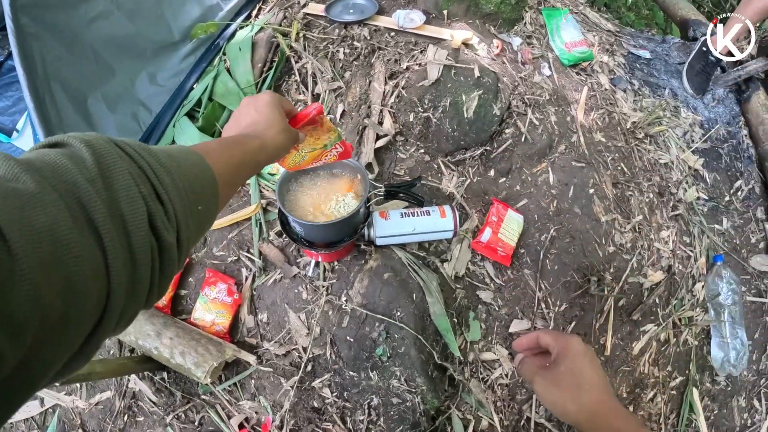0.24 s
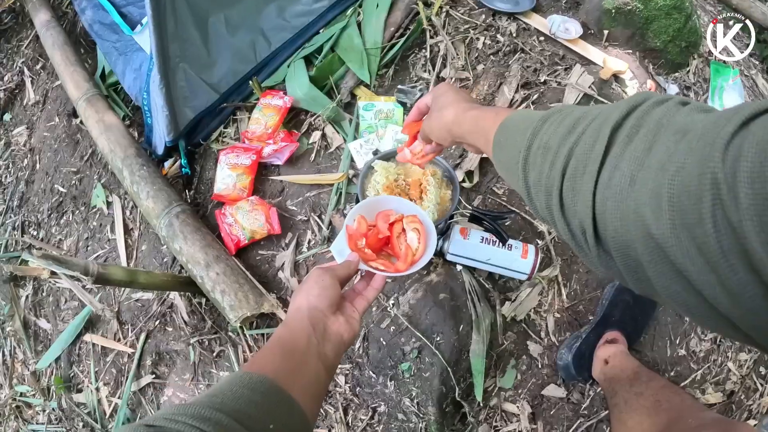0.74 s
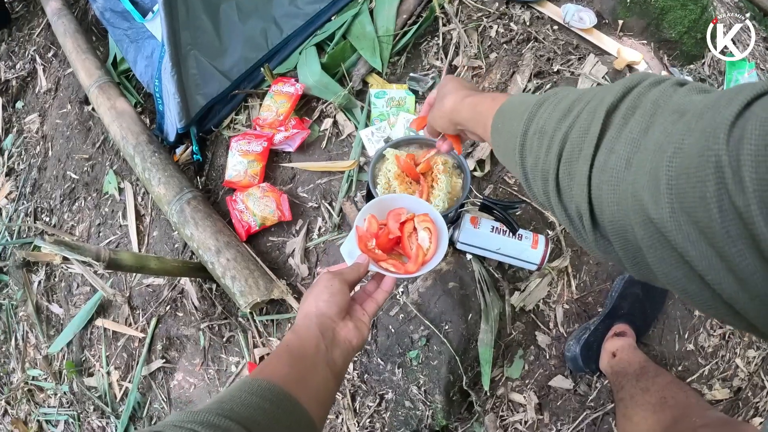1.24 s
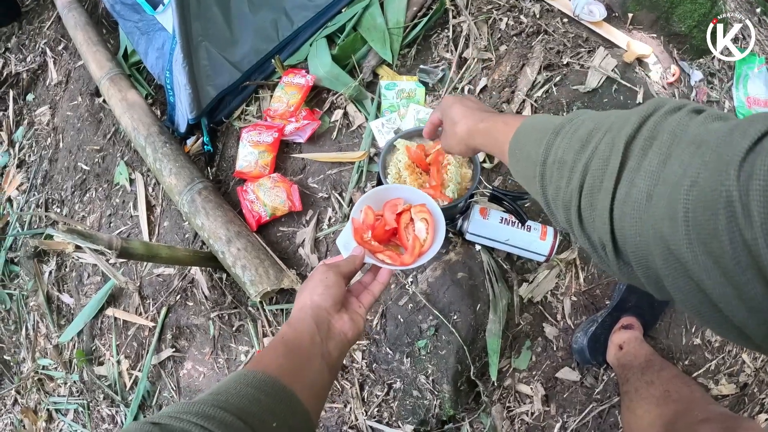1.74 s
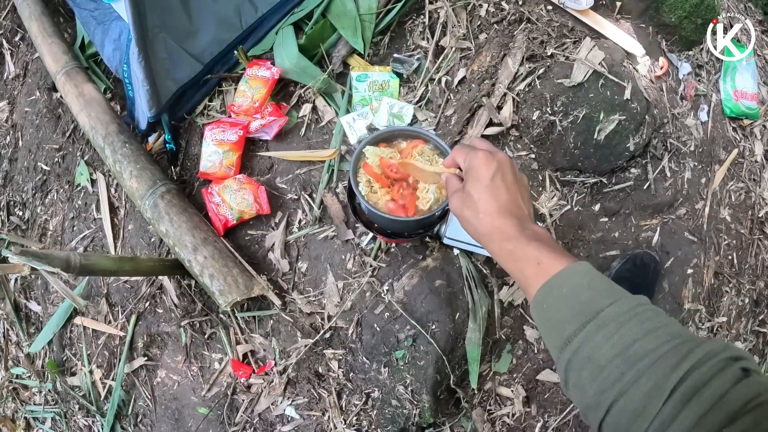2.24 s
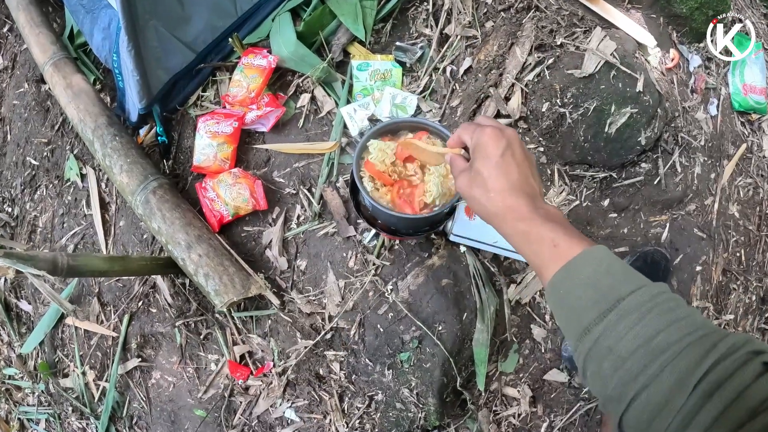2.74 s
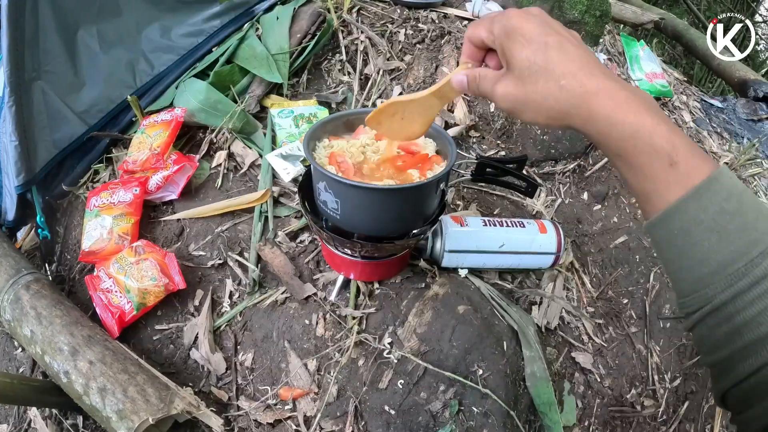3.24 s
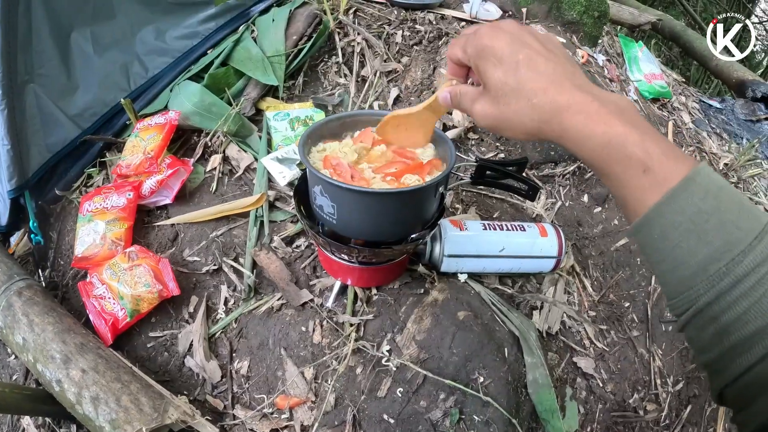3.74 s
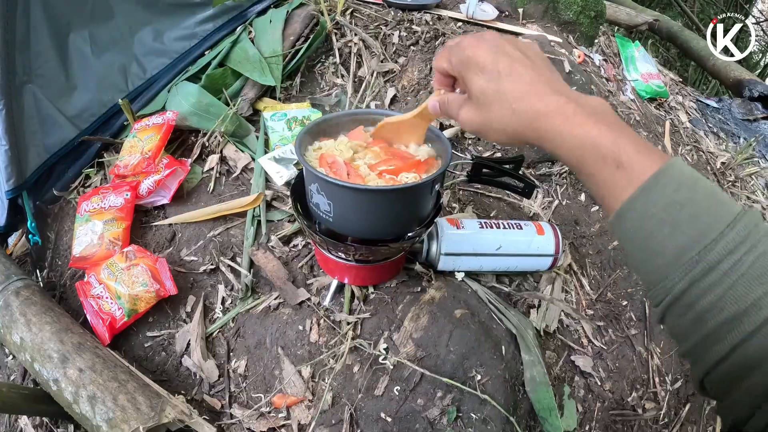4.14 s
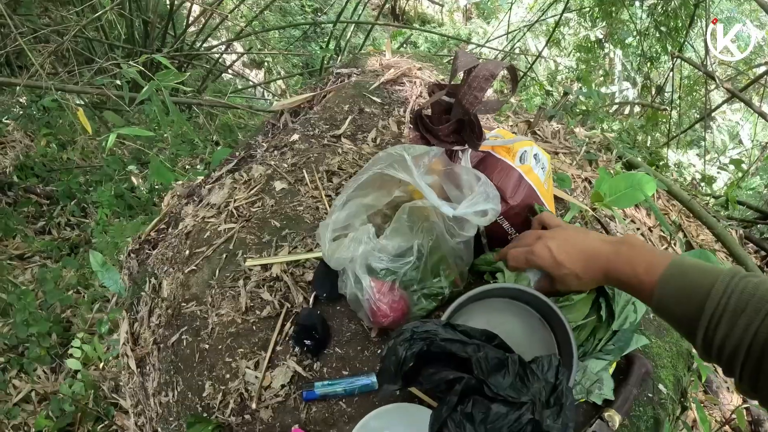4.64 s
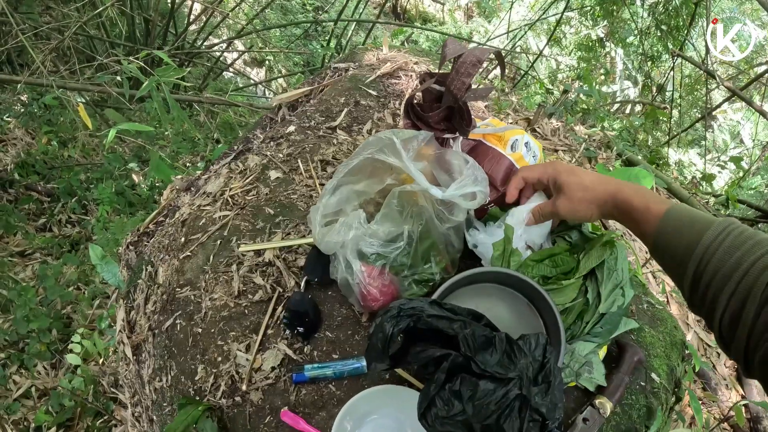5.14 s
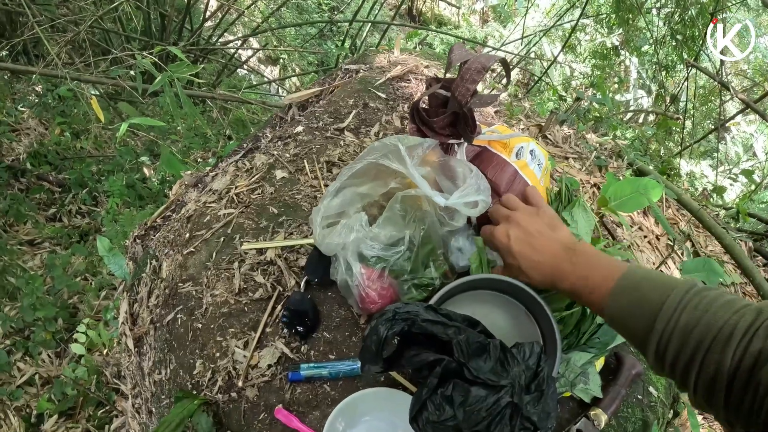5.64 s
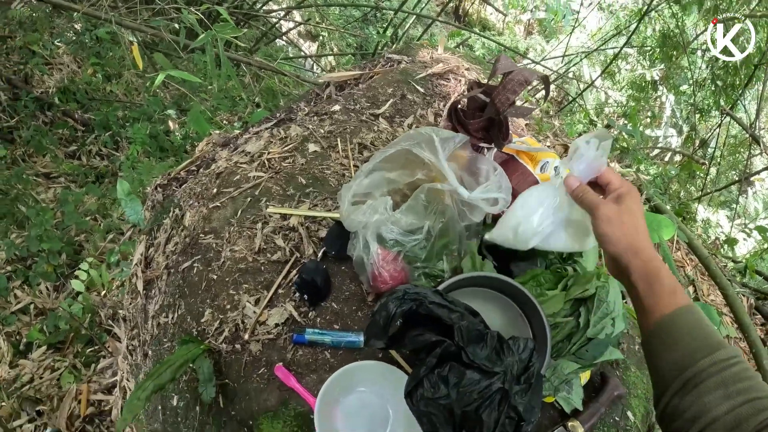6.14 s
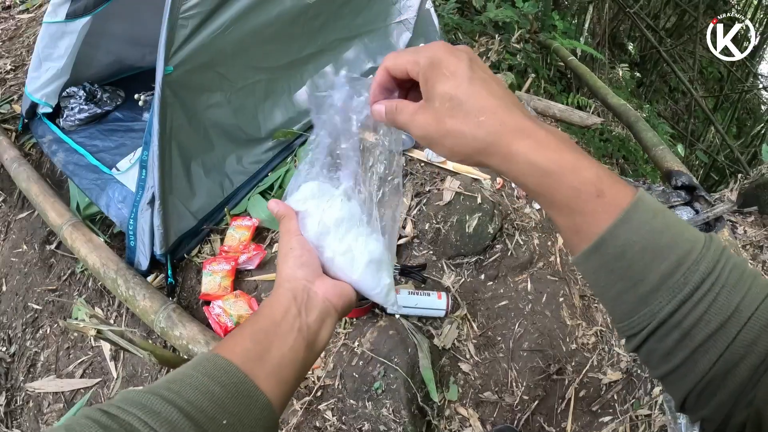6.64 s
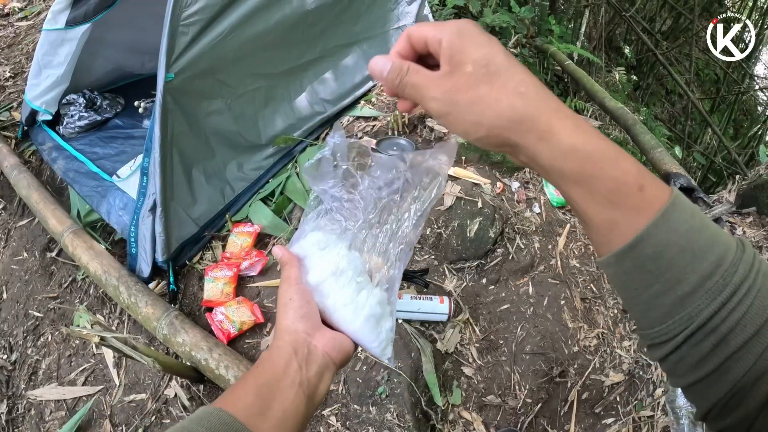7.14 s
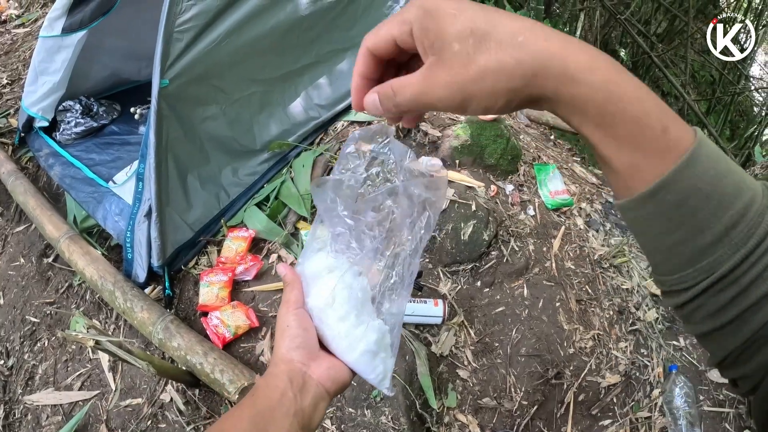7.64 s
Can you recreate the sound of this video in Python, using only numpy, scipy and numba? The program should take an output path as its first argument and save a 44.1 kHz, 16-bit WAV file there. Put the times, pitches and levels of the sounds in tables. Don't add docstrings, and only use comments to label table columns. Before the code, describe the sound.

Outdoors at a forest camp, close stereo, dry, with gas-burner hiss, buzzing cicadas and a thin, very high cricket. From 0 to 0.55 s a stiff packet crackles brightly. After a tiny gap, 0.6-1.7 s is quieter: soft simmering, faint stirring and small mount creaks. From 1.8 to 2.9 s, air rumble, a heavy low bump at the start and another cluster near 2.5 accompany dull bowl and pot taps. At 2.95-4.4 s a wooden spoon stirs, with clear taps around 3.8 and 4.2. From 4.5 to 6.3 s cicadas rise and a hand rustles through thin bags, snapping more toward the end. At 6.35-7.65 s a large bag crackles in jerks, loudest near 6.75 and 7.5, with a lull between. From 7.7 s it is pulled wide with sharp snaps, ending abruptly near 7.95. Every change is a hard stop, brief silence, quick fade-in.

```python
import sys
import numpy as np
from scipy import signal
from scipy.fft import rfft, irfft, next_fast_len
from scipy.io import wavfile
from scipy.ndimage import uniform_filter1d
from numba import njit

SR = 44100
rng = np.random.default_rng(int(sys.argv[2]) if len(sys.argv) > 2 else 0)


def dump_mix(stems):
    frames = np.atleast_2d(stems).T
    limited = np.clip(frames, -1, 1)
    pcm = np.round(limited * 32767).astype(np.int16)
    wavfile.write(sys.argv[1], SR, pcm)


def attenuation_scalar(level_db):
    decades = np.asarray(level_db, float) / 20
    return 10 ** decades


N = 348390

# (start [s], end [s], cicada level [dB])
TAKES = [
    (-.05, 0.5514, -54.5),
    (0.6015, 1.7333, -55.5),
    (1.783, 2.8898, -55),
    (2.9425, 4.418, -54),
    (4.4665, 6.3014, -42),
    (6.3503, 7.6747, -48.5),
    (7.7245, 7.95, -47),
]
# (film rustle [dB], crisp crackle [dB], simmer [dB], air on the ports [dB])
REST = [(-52.5, -52.5, -55.5, -60.5), (-63, -61, -49, -54.5), (-48.5, -55, -72, -57),
        (-59, -59, -55.5, -56.5), (-57, -48.5, -58, -55.5), (-49.5, -52, -51, -56), (-44.5, -46, -56, -57)]


def unit(x):
    return x / np.sqrt(np.mean(x ** 2))


def colour(x, points):
    hz, db = np.transpose(points)
    size = next_fast_len(N, True)
    axis = np.arange(size // 2 + 1) * SR / size + 1e-3
    gain = attenuation_scalar(np.interp(np.log(axis), np.log(hz), db))
    return unit(irfft(rfft(x, size) * gain, size)[:N])


def walk(rate):
    k = int(SR / rate)
    held = np.repeat(rng.standard_normal(N // k + 1), k)
    return 1.3 * uniform_filter1d(uniform_filter1d(held, k), k)[:N]


def twin(x):
    return np.array([x, np.roll(x, N // 3)])


@njit
def ring(start, hz, cycles, size, rise):
    out = np.zeros(N)
    for k in range(len(start)):
        turn = np.exp((2j * np.pi - np.log(10) / cycles[k]) * hz[k] / SR)
        z, held = size[k] + 0j, 1.
        slower = np.exp(-hz[k] / SR / rise)
        last = min(N, int(start[k] + 2.5 * cycles[k] * SR / hz[k]))
        for i in range(max(0, int(start[k])), last):
            out[i] += z.imag * (1 - held)
            z *= turn
            held *= slower
    return out


def grains(lo_hz, hi_hz, cycles, scatter_db, count):
    when, pitch, length, size = rng.random((count, 4)).T
    hz = lo_hz * (hi_hz / lo_hz) ** pitch
    loudness = attenuation_scalar(-scatter_db * np.log(1.01 - size))
    return unit(ring(when * N, hz, cycles * (.5 + length), loudness, .4))


def struck(table, spread_s, count, rise, octaves=1.46, fade_db=12):
    s, db, hz, cycles = np.repeat(np.transpose(table), count, axis=1)
    follows = np.arange(len(s)) % count > 0
    late, pitch = rng.random((len(s), 2)).T * follows
    start = (s + spread_s * late - rise / hz) * SR
    pitches = hz * 2 ** (octaves * (pitch - .5) * (late > 0))
    return ring(start, pitches, np.clip(cycles, 1, 40), attenuation_scalar(db - fade_db * np.sqrt(late)), max(rise, .01))


def ports(x, other, share, lead, pan_db, band_hz=(5, 5000)):
    share = np.clip(share, 0, .9)
    shift = np.real(signal.hilbert(x, next_fast_len(N))[:N] * (np.exp(1j * lead) - 1))
    right = x + signal.filtfilt(*signal.butter(1, band_hz, "band", fs=SR), shift)
    both = np.sqrt(1 - share ** 2) * np.array([x, right]) + share * np.array([other, -other])
    return both * attenuation_scalar(np.array([pan_db, -pan_db]) / 2)


def effort(t, moves, rise_db_s, fall_db_s):
    coarse = t[::44]
    power = np.zeros(len(coarse))
    for s, hold, db in np.transpose(moves):
        before = np.maximum(s - coarse, 0)
        after = np.maximum(coarse - s - hold, 0)
        power += attenuation_scalar(2 * (db - rise_db_s * before - fall_db_s * after))
    return np.interp(t, coarse, power)


def port_noise():
    tone = [(6000, -36), (11000, 3), (12300, 10), (12900, -15), (14800, -3), (15800, -40)]
    left_db, right_db = -72, -81
    return [attenuation_scalar(db) * colour(rng.standard_normal(N), tone) for db in (left_db, right_db)]


def burner(take):
    # (frequency [Hz], level per Hz [dB])
    places = [
        [(59, -40), (100, -9), (228, -4.5), (861, -5.5), (977, 0), (2930, -6), (3770, -1.5), (6260, -10.5),
         (7730, -7.5), (15500, -49)],
        [(59, -33), (100, -8), (258, -22), (1020, 2), (2580, -7), (3770, -3.5), (6530, -12.5), (7730, -9),
         (12300, -32.5), (15500, -53.5)],
        [(59, -28), (100, -1.5), (228, -1), (420, -8.5), (843, -8.5), (2000, -7), (5630, -11.5), (6530, -16.5),
         (7890, -8), (15500, -48.5)],
        [(59, -5), (100, 0.5), (313, -1), (758, -21), (977, -8.5), (3850, -9), (6260, -21), (8230, -22.5),
         (14200, -40), (15500, -58)],
        [(59, -44), (100, -23), (564, -1), (843, -12.5), (977, -6), (1160, -4.5), (1960, -3.5), (3930, -5.5),
         (8770, -11.5), (15500, -70)],
        [(59, -41), (100, -10), (214, 0.5), (712, -4.5), (977, 5), (1430, -3.5), (1920, -3.5), (3850, -7.5),
         (8770, -19), (15500, -59)],
    ]
    hiss_db = [-44, -45, -43.5, -45.5, -42, -48, -43]
    jet = rng.standard_normal(N) * attenuation_scalar(0.87 * walk(25) + 1.0 * walk(150))
    hiss = np.choose(np.minimum(take, 5), [twin(colour(jet, points)) for points in places])
    return hiss * attenuation_scalar(hiss_db)[take]


def cicadas(take):
    # (multiple of the note, level [dB])
    overtones = [(1, -1.5), (2, 2.5), (3, 2), (4, 2), (5, -3.5), (6, -12)]
    note_hz, spread = 977.6, .03
    hz = [note_hz * (1 + spread * walk(60)) for _ in range(6)]
    phase = np.array([np.cumsum(f) * 2 * np.pi / SR for f in hz], np.float32) % (2 * np.pi)
    buzz = sum(attenuation_scalar(db) * np.cos(round(m) * phase).sum(axis=0) for m, db in overtones)
    song = unit(buzz * attenuation_scalar(0.81 * walk(70)))
    return twin(song) * attenuation_scalar(np.array(TAKES)[take, 2])


def cricket(t):
    # (time [s], level [dB])
    loudness = [(0, -78), (.2, -55), (.34, -54), (.37, -54), (.5, -58), (.6, -57), (1.19, -53),
                (1.73, -58.5), (1.79, -60), (2.44, -55), (2.89, -58), (2.95, -70), (3.5, -64.5),
                (4.42, -67), (4.47, -83), (6.35, -63), (7.0, -77)]
    # (middle [s], half length [s])
    rests = [(.257, .011), (.352, .013), (.432, .01), (0.5, 0.0075), (4.05, .03)]
    # (start [s], end [s],
    # frequency [Hz], level [dB])
    far_notes = [(.62, 1.3, 3800, -67), (1.3, 1.74, 3770, -60), (2.5, 2.9, 4600, -64),
                 (4.74, 5.46, 3826, -55), (4.6, 6.2, 3046, -60), (5.6, 5.82, 3614, -60),
                 (5.55, 5.7, 3815, -61), (5.845, 5.905, 600, -42), (1.97, 2.06, 1975, -56),
                 (2.2, 2.5, 4550, -63), (.62, 1.74, 4090, -67), (2.96, 4.41, 3800, -66)]
    note_hz, rest_db, rest_edge_s = 7958, -18, .004
    resting = sum(np.clip((half - np.abs(t - s)) / rest_edge_s, 0, 1) for s, half in rests)
    flutter = attenuation_scalar(np.interp(t, *np.transpose(loudness)) + rest_db * resting + 1.9 * walk(90))
    out = flutter * np.sin(np.cumsum(note_hz + 9.6 * walk(60)) * 2 * np.pi / SR)
    for start, end, hz, db in far_notes:
        held = np.clip(np.minimum(t - start, end - t) / 0.0079, 0, 1)
        level = held * attenuation_scalar(db + 3.5 * walk(30))
        out = out + level * np.sin(np.cumsum(hz + 4.7 * walk(13)) * 2 * np.pi / SR)
    return np.sqrt(2) * out


def air(t, take):
    # (start [s], hold [s], level [dB])
    gusts = [(0.53, .03, -46), (.69, .02, -58), (1.65, .08, -61), (1.803, 0.3, -44), (2.208, 0.16, -39),
             (2.62, 0.26, -42), (3.55, 0.084, -60), (3.89, 0.026, -58), (4.07, .02, -43), (5.086, .05, -46),
             (5.605, 0.018, -44), (5.887, 0.41, -49.5), (6.494, .03, -49), (6.767, 0.019, -40),
             (7.395, 0.037, -54), (7.47, .04, -42), (7.56, 0.11, -51), (7.73, .17, -50)]
    tone = [(4, -7.5), (12, 0.5), (28, -11.0), (55, -12.5), (80, -21.0), (200, -66)]
    rumble = colour(rng.standard_normal(N), tone) * attenuation_scalar(2 * walk(13))
    power = effort(t, np.transpose(gusts), rise_db_s=182, fall_db_s=160)
    gain = np.sqrt(power + attenuation_scalar(2 * np.array(REST)[take, 3]))
    return twin(rumble) * gain * attenuation_scalar(1.5)


def knocks():
    # (time [s], peak level [dB], frequency [Hz], length [cycles])
    hits = [(.534, -29.5, 150, 2.1), (1.795, -11.5, 315, 0.67), (1.953, -29, 232, 1.4),
            (2.4815, -15.5, 360, 2.8), (2.4977, -16, 366, 2.6), (2.4972, -15.5, 754, 2.5),
            (2.512, -13, 380, 2.1), (2.518, -17, 306, 1.3), (3.381, -33, 520, 2), (4.052, -27.5, 43, 1.9),
            (4.513, -21, 514, 1.1), (4.519, -31, 566, 1.8), (4.695, -30, 520, 3.2), (4.7215, -30, 600, 2.5),
            (4.927, -28, 590, 2.6), (5.825, -29.5, 523, 5.6), (5.866, -33, 547, 6), (5.884, -25, 625, 4.7),
            (5.897, -34, 694, 4.6), (6.188, -30, 216, 4.4), (6.398, -28, 780, 3), (6.479, -21.5, 725, 2.4),
            (6.8, -28, 71, 2.6), (7.3805, -33, 260, 1.3), (7.4, -31, 85, 2.4), (7.4003, -22.5, 680, 3.7),
            (7.46, -23, 610, 3), (7.736, -29, 161, 2.8)]
    # (time [s], peak level [dB])
    bumps = [(.672, -38), (.713, -39), (1.239, -41), (1.633, -39), (1.692, -40), (1.861, -31), (1.915, -43),
             (2.495, -24), (2.707, -40), (2.854, -46), (3.374, -45), (3.516, -46), (3.651, -43),
             (3.919, -32), (6.365, -35), (6.829, -27.5), (6.889, -38), (7.514, -27.5), (7.738, -28.5)]
    return struck(hits + [(s, db, 125, 1.8) for s, db in bumps], spread_s=.004, count=1, rise=.15)


def creaks():
    # (time [s], peak level [dB])
    slips = [(.632, -36), (0.668, -33), (0.709, -33), (0.761, -35), (0.828, -31), (0.985, -38), (.885, -33),
             (1.235, -28.5), (1.631, -30.5), (1.676, -33), (1.86, -36), (4.056, -44), (5.6, -38),
             (5.861, -41), (5.926, -30)]
    rings = struck([(s, db, 280, 1.5) for s, db in slips],
                   spread_s=0.0155, count=3, rise=0.11, octaves=3.1, fade_db=3.0)
    return rings * np.array([[-.2], [1.5]])


def handling(t, take):
    # (start [s], hold [s], rustle [dB], crackle above it [dB], weight above it [dB])
    cooking = [(0, 0.024, -39.5, -1, -13), (.09, 0.061, -47.5, 7.5, -8), (.3, .02, -56, 6, -22),
               (.65, 0.26, -57, -8, 10), (1.03, 0.018, -46.5, -9, 6), (1.23, 0.035, -54, -9, 6),
               (1.35, 0.046, -47, -8, -18), (1.63, 0.12, -45, -10, -9), (1.79, 0.011, -46, -11, 5),
               (1.9, 0.025, -48.5, -4, 2.5), (2.25, 0.046, -56, -6, -1), (2.66, 0.013, -41.5, -17, -5),
               (2.85, 0.036, -47, -4, -13), (2.95, 0.12, -52.5, -14, -1), (3.33, 0.23, -50.5, -17, -3),
               (3.74, 0.12, -46.5, -14, -14), (3.89, 0.0092, -44.5, -18, 0), (4.07, 0.11, -46.5, -11, -20),
               (4.23, 0.03, -42.5, -26, -4)]
    # (start [s], hold [s], rustle [dB], crackle above it [dB], weight above it [dB])
    digging = [(4.51, 0.081, -42.5, -17, -8), (4.707, 0.19, -39.5, -22, -6.5),
               (4.972, 0.22, -38.5, -8, -9.5), (5.386, 0.2, -39, -6.5, -8), (5.715, 0.29, -38.5, -4, -9),
               (6.059, 0.045, -33.5, -4, -13), (6.153, 0.11, -39.5, -1, -8)]
    # (start [s], hold [s], rustle [dB], crackle above it [dB], weight above it [dB])
    jerks = [(2.48, 0.042, -41.5, -17, 7), (6.35, 0.096, -32, -3, -12), (6.44, 0.085, -35.5, -2.5, -7),
             (6.58, 0.14, -42, -5.5, -5), (6.69, 0.032, -35.5, 0, -7), (6.738, 0.094, -29, -5, -8.5),
             (6.775, 0.033, -28.5, -2, -10), (6.88, .025, -34, -1, -2.5), (6.934, 0.03, -38, -4, -5.5),
             (7.402, 0.0076, -31, -4.5, -4), (7.43, 0.022, -50, -8, -4), (7.447, .008, -38, -8, -2),
             (7.459, 0.01, -25.5, -4.5, -4), (7.475, 0.041, -26, -4.5, -7.5), (7.52, 0.056, -39.5, -10, -9),
             (7.576, 0.017, -36, -3, -5), (7.6, 0.094, -47, -6, -15), (7.75, 0.015, -45.5, -10, 3),
             (7.818, 0.039, -34.5, -5, -15), (7.875, 0.0097, -32.5, -3, -24)]
    power = attenuation_scalar(2 * np.array(REST)[take, :3]).T
    for table, rise_db_s, fall_db_s in [(cooking + digging, 144, 173), (jerks, 1100, 1100)]:
        s, hold, db, crackle_db, weight_db = np.transpose(table)
        for row, extra_db in enumerate((0, crackle_db, weight_db)):
            power[row] += effort(t, (s, hold, db + extra_db), rise_db_s, fall_db_s)
    return np.sqrt(power)


def simmer_and_thuds(weight):
    tone = [(45, -42), (85, -30.0), (140, -4.5), (300, 0.0), (500, 4.0), (800, 4.5), (2000, -39.0)]
    thud = colour(grains(81.0, 791.0, cycles=2.55, scatter_db=1.5, count=4000), tone)
    return twin(thud) * weight * attenuation_scalar(-4.0)


def taps():
    # (time [s], peak level [dB], frequency [Hz])
    strikes = [(0.738, -42, 910), (0.7979, -25, 3490), (0.9413, -34, 1210), (1.5611, -33, 1120),
               (1.6565, -31, 3700), (1.794, -28, 2450), (1.7999, -28, 3270), (2.163, -29, 1720),
               (2.1972, -25.5, 1550), (2.2761, -30, 1440), (2.429, -29, 4200), (2.4969, -22, 2540),
               (2.5112, -24, 2110), (2.5187, -25, 1510), (2.578, -24, 1720), (2.636, -27, 1550),
               (2.6497, -30, 1380), (2.652, -33, 1250), (2.6805, -26, 1880), (2.7834, -25, 3100),
               (2.8598, -22.5, 1400), (2.8692, -29, 1380), (3.054, -27, 2540), (3.442, -34, 1130),
               (3.4473, -30, 1210), (3.594, -32, 2150), (3.7632, -21, 2500), (3.7962, -19, 3000),
               (3.918, -30, 1250), (4.0455, -39, 1590), (4.0746, -37, 3120), (4.171, -26.5, 1680),
               (4.226, -30, 1500), (4.2393, -26, 1290), (4.2917, -30, 2450),
               (1.238, -28, 2200), (1.63, -27, 2500), (2.4815, -28, 2600), (2.494, -28, 1600),
              (3.7625, -26, 3800), (3.7967, -29, 1490), (4.245, -29, 2300), (4.251, -25, 2000),
              (4.72, -23, 3480)]
    rings = struck([(*tick, 1.9) for tick in strikes], spread_s=0.0011, count=2, rise=0.41, fade_db=22)
    return rings * attenuation_scalar(5)


def plastic_film(rustle, crackle):
    rustle_tone = [(300, -5.5), (800, -3.0), (1400, -1.0), (3800, 8.5), (4900, 7.0), (5500, 8),
                   (9000, -28), (16000, -40)]
    crackle_tone = [(2500, -3.0), (5000, -3.0), (9000, -2.5), (11000, -9.5), (13000, -6.0),
                    (15000, -12), (16000, -50)]
    burst = attenuation_scalar(1.09 * walk(170))
    film = colour(grains(569.0, 5600.0, cycles=1.37, scatter_db=1.0, count=40000), rustle_tone)
    crisp = colour(grains(4550.0, 13100.0, cycles=2.2, scatter_db=3.8, count=40000), crackle_tone)
    return burst * (twin(film) * rustle + twin(crisp) * crackle) * attenuation_scalar(-4.5)


def packet():
    # (time [s], peak level [dB], frequency [Hz])
    stiff = [(.009, -27, 6860), (0.018, -22, 7500), (.023, -27, 7350), (.056, -39, 5500), (.076, -29, 7500),
             (.0975, -20, 7900), (.1045, -36, 2420), (.1135, -29, 4200), (.12, -23, 4000),
             (.124, -23, 7000), (0.128, -31, 3960), (0.132, -23, 4300), (.145, -33, 5000),
             (.157, -31, 7500), (.182, -30, 3500)]
    rings = struck([(*tick, 4.5) for tick in stiff], spread_s=0.0025, count=2, rise=1.0, octaves=0.3)
    return rings * attenuation_scalar(5.0)


def bags():
    # (time [s], peak level [dB], frequency [Hz])
    snaps = [(4.5306, -29, 2970), (4.575, -30, 1930), (4.7216, -28, 900), (4.78, -25, 2070),
             (4.7977, -15, 4610), (4.851, -25, 1720), (4.8804, -22, 1950), (4.8833, -19, 4780),
             (4.8876, -19, 4820), (4.9539, -19, 4480), (5.1447, -30, 3620), (5.148, -23, 4390),
             (5.1595, -24, 2240), (5.1693, -12.5, 8240), (5.1788, -16, 6680), (5.1895, -24, 8500),
             (5.2037, -25, 3320), (5.2281, -26, 4310), (5.2305, -26, 8300), (5.3087, -23, 4090),
             (5.3614, -31, 4010), (5.37, -28, 1930), (5.3844, -22, 4520), (5.3899, -36, 2410),
             (5.4481, -23, 4480), (5.538, -26, 1680), (5.551, -27, 1640), (5.6118, -27, 3960),
             (5.652, -24, 2240), (5.6668, -26, 2330), (5.7218, -32, 2130), (5.8504, -21, 2560),
             (5.9, -28, 900), (5.9553, -18, 6240), (6.0144, -22, 3010), (6.0565, -15, 4220),
             (6.072, -19, 7000), (6.074, -19, 2020), (6.0859, -15, 6720), (6.0955, -18, 7140),
             (6.0975, -16, 7000), (6.158, -21, 2890), (6.2086, -25, 4260), (6.212, -24, 2450),
             (6.2605, -17, 2330), (6.2646, -18, 2120), (6.2896, -21, 7020)]
    # (time [s], peak level [dB], frequency [Hz])
    creases = [(6.3667, -24, 4180), (6.3697, -20, 4910), (6.3722, -15, 4310), (6.3904, -16, 5340),
               (6.4033, -22, 3960), (6.4148, -15, 4650), (6.422, -18, 5430), (6.4565, -18, 6000),
               (6.4673, -24, 3790), (6.4871, -28, 900), (6.5144, -27, 4220), (6.519, -39, 1730),
               (6.5249, -32, 3010), (6.6106, -28, 4820), (6.626, -32, 1220), (6.6903, -26, 2410),
               (6.6949, -23, 5000), (6.701, -27, 2220), (6.7425, -22, 5040), (6.7459, -15, 4260),
               (6.75, -18, 7320), (6.755, -16, 3920), (6.7591, -22.5, 890), (6.7623, -7.5, 7360),
               (6.7734, -17, 4480), (6.7799, -26, 2800), (6.7847, -16, 4690), (6.8143, -14, 3570),
               (6.8196, -20, 860), (6.8233, -23, 3030), (6.8259, -18, 5000), (6.835, -18, 3140),
               (6.8853, -13.5, 4310), (6.8884, -30, 900), (6.8915, -21, 2410), (6.8805, -22, 8000),
               (6.8935, -18, 4300), (6.902, -24, 4650), (6.9225, -27, 6500), (6.942, -24, 7300),
               (6.9546, -14, 4600), (6.9634, -24, 7800), (6.992, -31, 7000),
               (7.163, -29, 3190), (7.166, -36, 1340), (7.2501, -28, 3700), (7.3995, -19, 5340),
             (7.4054, -24, 3830), (7.408, -20, 2330), (7.445, -35, 950), (7.448, -20, 2110),
             (7.4554, -24, 4310), (7.46, -18, 3300), (7.4632, -21, 890), (7.4653, -20, 1610),
             (7.4689, -17, 3880), (7.4722, -17, 2270), (7.4875, -18, 4050), (7.4946, -22, 4180),
             (7.5055, -11.5, 3730), (7.5156, -28, 4690), (7.5816, -20, 5000), (7.587, -30, 4130),
             (7.5975, -30, 1590), (7.7599, -24, 5380), (7.8139, -28, 4220), (7.8177, -18, 5810),
             (7.8278, -29, 1640), (7.85, -26, 1350), (7.8541, -11, 7900), (7.8754, -9.5, 6070),
             (7.8786, -19, 1770), (7.8907, -23, 4950)]
    rings = struck([(*tick, 3.2) for tick in snaps + creases],
                   spread_s=0.0019, count=2, rise=0.87, octaves=0.78, fade_db=21)
    return rings * attenuation_scalar(4.0)


def cuts(t, take):
    start, end = np.array(TAKES)[:, :2].T
    fade_in = .1 + (t - start[take]) / 0.02
    stop = (end[take] - t) / 0.00036
    return np.clip(np.minimum(fade_in, stop), 0, 1)


def scene():
    # (unshared share [0-1], phase lead of the right port [rad],
    # low sounds left minus right [dB], phase of low sounds [rad])
    placing = [(0.22, 0.81, -1, 0.36), (0.3, 0.61, 0.5, 0.37), (0.21, 0.74, -2, 0.9), (0.01, .002, 0, .001),
               (0.31, 0.61, -0.5, 0.24), (0.14, 0.58, -0.5, 0.024), (0.18, 0.68, 0, 0.087)]
    t = np.arange(N) / SR
    take = np.searchsorted(np.array(TAKES)[1:, 0], t)
    share, lead, pan_db, low_lead = np.array(placing)[take].T
    share = share + 0.065 * np.clip((t - 3.9) / 0.16, 0, 1) * (t < 4.44)

    rustle, crackle, weight = handling(t, take)
    upper, upper_other = burner(take) + cicadas(take) + plastic_film(rustle, crackle)
    upper = upper + cricket(t) + taps() + packet() + bags()
    high_pass = signal.butter(8, 10600, "high", fs=SR, output="sos")
    low_pass = signal.butter(8, 10400, fs=SR, output="sos")
    top = signal.sosfilt(high_pass, [upper, upper_other]) * attenuation_scalar([[-5.0], [-6.5]])
    placed = ports(upper, upper_other, share, lead, 0 * t, band_hz=(780, 8700))
    upper = signal.sosfilt(low_pass, placed) + top

    low = ports(*simmer_and_thuds(weight), 0.14 * share, low_lead, pan_db)
    low = low + ports(*air(t, take), 1.16 * share, low_lead, pan_db)
    shaken = ports(knocks(), 0 * t, 0 * t, 2.1 * low_lead, 3.0 * pan_db)
    total = upper + low + shaken + creaks() + port_noise()
    heard = signal.lfilter(*signal.butter(1, 3.0, "high", fs=SR), total)
    heard = signal.sosfilt(signal.ellip(8, .2, 60, 15700, fs=SR, output="sos"), heard)
    return heard * cuts(t, take)


def top_cut(x):
    return signal.sosfilt(signal.butter(12, 15750, fs=SR, output="sos"), x)


def record(dry):
    return top_cut(dry)


dry = scene()
out = record(dry)
dump_mix(out)
```